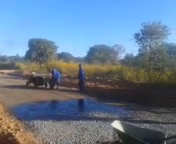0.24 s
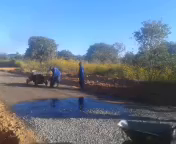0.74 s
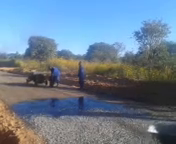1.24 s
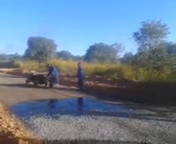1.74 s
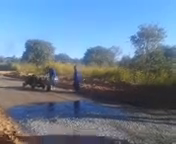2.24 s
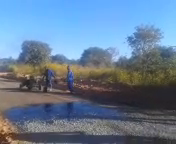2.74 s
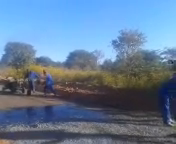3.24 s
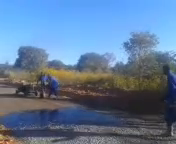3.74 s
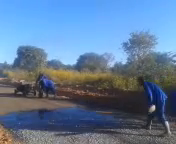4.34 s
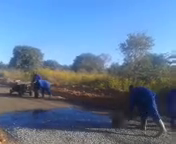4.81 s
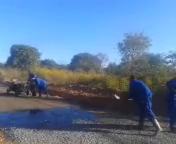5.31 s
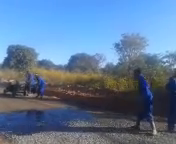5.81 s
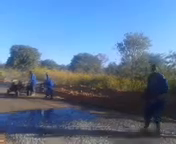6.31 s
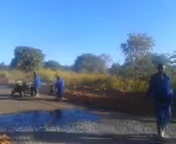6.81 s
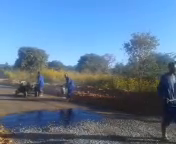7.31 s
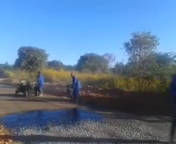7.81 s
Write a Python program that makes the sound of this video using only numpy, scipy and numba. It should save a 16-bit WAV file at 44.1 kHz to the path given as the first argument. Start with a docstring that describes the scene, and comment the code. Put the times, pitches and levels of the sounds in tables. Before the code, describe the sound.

Workers shovel and spread stone chips on a road bed outdoors. A sharp crunch and loud gravel rush open the scene, then scrapes shrink to small scattered crunches. After a quiet middle, a broad pour swells and fades, followed by light ticking, a faint steel clink and crisp final throws. A phone a few metres away hears it thin in bass, with dulled top treble and a faint hiss.

```python
"""Stone chips slide, pour and shower as workers shovel them over a road bed, a few metres from the phone.
Each slide is thousands of damped stone rings, in four sizes, that follow a list of swelling and dying loads.
Boots and shovels crunch as bursts of repeated knocks with a thud; a steel blade rings once through its modes.
Behind lie the noise hush of open country and a faint steady low noise. The microphone colour thins the bass;
16 kHz sampling leaves only a faint mirror above 8 kHz."""
import sys
import numpy as np
from scipy import signal
from scipy.fft import rfft, irfft
from scipy.io import wavfile
from scipy.ndimage import uniform_filter1d
from numba import njit

SR = 44100
rng = np.random.default_rng(int(sys.argv[2]) if len(sys.argv) > 2 else 0)


def invert_db(x):
    """Field ratio 10**(x/20) for x, a level in decibels (scalar or array-like)."""
    u = np.asarray(x, float) / 20
    return 10 ** u


def unload_audio(sound):
    """Save the sound as a 16-bit wav file, at the path given as the first command line argument."""
    columns = np.transpose(np.atleast_2d(sound))
    # keep every value between -1 and 1, then stretch to whole-number steps
    steps = np.round(np.clip(columns, -1, 1) * 32767)
    wavfile.write(sys.argv[1], SR, steps.astype(np.int16))


N = 355446
T = np.arange(N) / SR

# pushes, scrapes and throws, swell and dying away each spanning 20 dB:
# [fullest flow t/s, relative level/dB, swell t/s, dying away t/s, coarseness level/dB]
SLIDES = [(0.0, -34.5, .01, .13, -6.5), (.13, -51.5, .03, 0.057, -11), (.226, -34, 0.02, .02, -1),
          (.24, -27, 0.01, 0.1, -2), (.27, -37.5, 0.058, 0.22, 5.5), (.38, -40, 0.14, .05, 4),
          (.415, -42, .005, 0.44, 6), (.68, -27.5, 0.44, 0.51, 1), (.55, -32.5, 0.19, 0.36, -1),
          (.79, -28, 0.103, 0.15, -5.5), (.885, -30, .003, 0.25, -9), (.93, -34, .06, .06, -3),
          (1.05, -37, 0.26, 0.27, 0.5), (1.16, -33.5, 0.22, 0.11, 5), (1.28, -40, 0.16, 0.22, 1),
          (1.4, -39.5, 0.94, 0.53, 3), (1.59, -52.5, 0.024, 0.14, 6), (1.713, -39.5, .05, 0.21, 0),
          (1.847, -39, 0.049, 0.15, 1), (1.993, -40.5, 0.078, 0.033, 3), (2.03, -33, 0.052, 0.18, 4),
          (2.3, -42.5, 0.22, 0.33, 2.5), (2.47, -41.5, 0.19, .3, -1), (2.5, -48, 0.11, 0.14, 7.5),
          (2.67, -53.5, .2, .2, -5), (2.732, -41, 0.12, 0.031, -5), (2.785, -47.5, 0.046, .2, 9.5),
          (2.85, -29.5, 0.075, 0.067, 0.5), (3.0, -47, 0.56, 0.46, 2), (3.49, -49, 0.29, 0.48, 3.5),
          (3.555, -51.5, .12, 0.27, 8.5), (3.72, -46, 0.013, 0.29, 5), (3.8, -45.5, 0.19, 0.042, 1.5),
          (4.096, -50.5, 0.28, 0.17, 6), (4.23, -38.5, 0.076, 0.39, -4), (4.39, -40, 0.3, 0.16, 3.5),
          (4.52, -45, 0.081, .3, 8.5), (4.86, -47.5, 0.15, 0.054, -9), (4.91, -34, .03, 0.66, -5.5),
          (5.12, -42, 0.62, 0.47, -17), (5.24, -33, 0.17, 0.33, 0.5), (5.34, -29, 0.24, 0.25, 1.5),
          (5.4, -30.5, 0.22, 0.24, 2), (5.48, -31.5, 0.41, 0.1, 3), (5.53, -43, 0.34, 0.077, 9.5),
          (5.623, -50, .06, 0.035, 19.5), (5.76, -59, 0.082, 0.077, 23), (5.79, -43, .005, 0.2, 2),
          (5.882, -48.5, 0.16, 0.28, 7.5), (6.3, -52, 0.64, 0.43, 10), (6.44, -42.5, .2, 0.19, 7),
          (6.5, -43.5, 0.19, 0.34, 7.5), (6.57, -48, .15, 0.23, 9.5), (6.642, -46, .03, .1, 7),
          (6.77, -46, 0.011, 0.26, 8.5), (6.915, -34.5, 0.013, 0.039, -5), (6.96, -48.5, 0.14, 0.3, 8),
          (7.11, -54, .12, .06, 11), (7.199, -38, 0.0094, 0.03, -3), (7.257, -41.5, 0.062, 0.053, 1.5),
          (7.35, -57.5, .15, 0.11, 7.5), (7.52, -29, 0.013, 0.19, -2.5), (7.567, -28.5, 0.063, 0.024, 5),
          (7.687, -59, 0.23, .15, -6), (7.84, -54, 0.33, 0.28, 7), (7.95, -31.5, 0.0074, 1, -2),
          (8.04, -39, 0.15, .5, 6)]
# boots and shovels biting into the chips:
# [t/s, relative peak level/dB, pitch f/Hz, relative thud level/dB, pitch scatter as a log-pitch spread]
CRUNCHES = [(0.0257, -17.5, 3890, -47, 0.22), (0.2062, -23, 2380, -38, 0.27),
            (0.2346, -7.5, 2140, -18, 0.26), (0.3102, -21.5, 2850, -35, 0.16),
            (0.3433, -22, 3000, -34, 0.3), (0.415, -23, 2130, -39, 0.3), (0.6784, -23, 2660, -31, 0.3),
            (0.7826, -11, 1377, -16.5, 0.3), (0.8818, -16, 4190, -37, 0.3), (0.9125, -15, 3500, -39, 0.16),
            (1.1677, -17, 4720, -34, 0.37), (1.264, -21, 1510, -46, 0.4), (1.3566, -20, 4730, -41, 0.2),
            (1.4174, -22, 3350, -43, 0.35), (1.5074, -24, 4700, -32, 0.3), (1.5427, -22, 3770, -47, 0.4),
            (1.5898, -29, 3080, -49, 0.14), (1.6068, -22, 2410, -43, 0.12), (1.6646, -35, 2370, -45, 0.3),
            (1.6971, -24, 4970, -40, 0.3), (1.7282, -25.5, 4770, -44, 0.2),
            (1.7843, -25.5, 5140, -40, 0.13), (1.8372, -26, 2150, -43, 0.42),
            (1.9247, -22.5, 2110, -46, 0.38), (1.991, -24, 1486, -30, 0.3), (2.0208, -20, 4560, -26, 0.2),
            (2.0437, -15.5, 2140, -30, 0.32), (2.1144, -27, 3320, -56, 0.25),
            (2.204, -24.5, 2780, -37, 0.42), (2.2293, -29, 5270, -46, 0.24), (2.2434, -38, 4520, -44, 0.3),
            (2.2613, -27, 1250, -45, 0.3), (2.2894, -28, 1263, -49, 0.3), (2.318, -25, 5180, -46, 0.05),
            (2.3436, -23.5, 3740, -50, 0.3), (2.3693, -26, 4700, -52, 0.35),
            (2.4134, -19.5, 2250, -40, 0.42), (2.6554, -33, 3540, -69, 0.23),
            (2.825, -19.5, 4110, -26, 0.4), (2.8473, -19, 5200, -31, 0.2), (3.048, -27, 4420, -62, 0.14),
            (3.1093, -25.5, 3260, -63, 0.41), (3.178, -37, 3210, -42, 0.33),
            (3.3525, -20.5, 2690, -49, 0.3), (3.4171, -40, 3900, -57, 0.2), (3.4411, -39, 2820, -59, 0.2),
            (3.4501, -38, 2850, -48, 0.2), (3.884, -32.5, 4620, -56, 0.3), (4.1684, -33, 4830, -58, 0.26),
            (4.372, -21, 2700, -27, 0.3), (4.4423, -28, 4420, -47, 0.35), (4.5228, -20, 4200, -25.5, 0.05),
            (4.555, -27, 3700, -43, 0.22), (4.6353, -35, 4280, -44, 0.2), (4.7204, -16.5, 4850, -48, 0.35),
            (4.799, -32, 5160, -56, 0.3), (4.8469, -27, 2830, -54, 0.38), (4.8865, -27, 2000, -43, 0.3),
            (4.8967, -24.5, 3410, -31, 0.3), (4.9104, -20, 4900, -33, 0.42), (5.6198, -34, 1310, -30, 0.4),
            (5.7484, -46, 1930, -37, 0.3), (5.788, -31, 2750, -38, 0.15), (5.8726, -29.5, 2060, -29, 0.36),
            (5.9684, -34, 1870, -32, 0.13), (5.9904, -28.5, 2030, -50, 0.37), (6.2076, -40, 1350, -33, 0.3),
            (6.2422, -36, 2180, -35, 0.2), (6.351, -35, 1210, -39, 0.3), (6.4193, -25, 1470, -41, 0.3),
            (6.4403, -24.5, 2240, -35, 0.3), (6.6368, -38, 1290, -32, 0.37),
            (6.6982, -29.5, 1990, -36, 0.3), (6.7428, -32, 1260, -40, 0.4), (6.7664, -27, 2200, -35, 0.35),
            (6.786, -25.5, 1410, -40, 0.36), (6.8315, -34.5, 1260, -41, 0.3), (6.8733, -34, 3660, -48, 0.4),
            (6.9099, -27, 1927, -39, 0.2), (6.983, -29, 3360, -53, 0.19), (7.0594, -33, 2060, -47, 0.3),
            (7.1095, -25, 4670, -32.5, 0.37), (7.1818, -31.5, 2140, -41, 0.25),
            (7.197, -26, 3620, -30.5, 0.31), (7.2584, -30, 2450, -46, 0.42), (7.4255, -33, 1340, -43, 0.34),
            (7.4825, -25.5, 4310, -43, 0.28), (7.5057, -13, 3520, -24, 0.25), (7.5235, -10, 4420, -24, 0.3),
            (7.5682, -13, 3490, -47, 0.2), (7.675, -24.5, 4800, -56, 0.3), (7.729, -31, 2010, -30, 0.4),
            (7.7837, -29.5, 4240, -52, 0.1), (7.8166, -36, 2260, -41.5, 0.1), (7.8685, -33, 4840, -53, 0.3),
            (7.884, -33, 2320, -54, 0.24)]
# blows on the blade: [t/s, relative peak level/dB]
BLADE_BLOWS = [(6.911, -20)]
# plate modes of the steel blade: [f/Hz, relative level/dB, 60 dB decay t/s]
BLADE_MODES = [(647, -11.5, 0.72), (780, -9, 0.51), (1470, -8, 0.27), (1870, -10.5, 0.46), (1965, 0, 0.2),
               (2500, -8.5, 0.38), (3620, -1, 0.14)]
# road bed, air and microphone, then the steep treble fall above 7 kHz: [f/Hz, level/dB]
MICROPHONE_COLOUR = [(100, -29.5), (150, -12), (260, -2), (500, 3), (800, -2), (1150, 0), (1600, -3),
                     (2200, -0.5), (3000, -1.5), (4100, 1), (5500, -0.5), (6700, -4), (7200, -8),
                     (7600, -33), (7950, -42)]
# resonances of the loaded shovel pan: [f/Hz, width f/Hz, relative level/dB]
PAN_RESONANCES = [(506, 51, 1), (1098, 24, -3.5), (1352, 110, -1.5), (2156, 41, 3.5), (2370, 13, -2.5),
                  (3276, 47, 4.5), (4050, 100, 3), (4700, 100, 1.5)]
# mix of the heap being worked: [t/s, relative grit level/dB, relative larger-stone level/dB]
HEAP_MIX = [(0, -1.5, 5.5), (.45, 4, -10), (.75, -1, 3.5), (1.2, 2, 1), (1.7, -3.5, -2.5), (2.3, -1.5, -4),
            (2.6, 1.5, 0.5), (3.2, -2, -1), (3.8, 1, 0), (4.3, 1, 0), (4.95, 3.5, -1.5), (5.15, 0.5, -2.5),
            (5.35, 1.5, 3), (5.55, -1.5, 8.5), (6.0, -7, -3), (6.5, 5.5, 0), (7.0, 3.5, -0.5),
            (7.4, 0.5, 5.5), (7.65, 2, -2.5), (8.06, 0.5, -2)]
# how loose the bed lies where the chips land, a deeper bed thuds lower: [t/s, central thud f/Hz]
BED_LOOSENESS = [(0, 440), (1.5, 450), (2.25, 388), (3.0, 399), (4.4, 379), (4.9, 372), (5.15, 510),
                 (5.9, 511), (6.5, 457), (7.2, 460), (7.7, 401)]


def rms1(x):
    """Scale to rms 1."""
    return x / np.sqrt(np.mean(x ** 2))


@njit
def rings(at, hz, t60, size, turn):
    """Sum of exponentially damped sines, one for each knock, each cut off after its t60."""
    out = np.zeros(N)
    for k in range(len(at)):
        step = np.exp(2j * np.pi * hz[k] / SR - np.log(1000) / (t60[k] * SR))
        z = size[k] * np.exp(1j * turn[k])
        for i in range(int(at[k] * SR), min(N, int((at[k] + t60[k]) * SR) + 1)):
            out[i] += z.real
            z *= step
    return out


def knocks(at, hz, spread, cycles, size, uneven_db):
    """Stones ring at scattered pitches, some dead and some clear; unevenness makes a few knocks hard."""
    pitch, clear = rng.standard_normal((2, len(at)))
    luck, turn = rng.exponential(size=len(at)), rng.random(len(at))
    hz = np.clip(hz * np.exp(spread * pitch), 100, 8000)
    t60 = cycles * np.exp(0.61 * clear) / hz
    hard = invert_db(uneven_db * luck)
    # ring energy times the mean power of the random hardness
    power = t60 * SR / (4 * np.log(1000)) / (1 - uneven_db * np.log(10) / 10)
    return rings(at, hz, t60, size * hard / np.sqrt(power), 2 * np.pi * turn)


def walk(rate):
    """Random levels held 1 / rate s and slewed over half that time; spread near 1."""
    held = rng.standard_normal(N // 100)[(T * rate).astype(int)]
    return uniform_filter1d(held, int(SR / rate / 2))


def low_noise():
    """Faint steady noise below 61 Hz."""
    low = signal.butter(6, 61, fs=SR, output="sos")
    return invert_db(-68) * rms1(signal.sosfilt(low, rng.standard_normal(N)))


def hush():
    """The even hush of open country: white noise."""
    return invert_db(-49.5) * rng.standard_normal(N)


def blade():
    """Every blow wakes the same plate modes, each starting from zero displacement."""
    s, peak_db = np.transpose(BLADE_BLOWS)[:, :, None]
    hz, mode_db, t60 = np.transpose(BLADE_MODES)
    size = invert_db(peak_db + mode_db - 14.5)
    at, hz, t60 = [(v + 0 * size).ravel() for v in (s, hz, t60)]
    return rings(at, hz, t60, size.ravel(), np.full(size.size, np.pi / 2))


def crunch():
    """A few stones knock over and over, fast at first and thinning out; the bed thuds a moment later."""
    s, peak_db, pitch_hz, thud_db, scatter = np.transpose(CRUNCHES)[:, :, None]

    def handful(count, level_db, hz, lag_s, span_s, **stone):
        late = rng.random((len(s), count)) ** 1.2  # 0 at the start of the burst, 1 at its end
        at = s + lag_s + span_s * late
        onset = 1 - np.exp(-late / 0.017)
        size = invert_db(level_db - 38.5 * late) * onset * np.sqrt(span_s * SR / count)
        return knocks(at.ravel(), (hz + 0 * late).ravel(), size=size.ravel(), **stone)

    # six stones around the named pitch, the first two on it
    offsets = scatter * rng.standard_normal((len(s), 6)) * [0, 0, 1, 1, 1, 1]
    stones_hz = np.tile(pitch_hz * np.exp(offsets), 8)
    thud_hz = 1.06 * np.interp(s, *np.transpose(BED_LOOSENESS))
    chips = handful(count=48, level_db=peak_db - 8.5, hz=stones_hz, lag_s=0, span_s=.02121,
                    spread=.025, cycles=73.0, uneven_db=0.0)
    thud = handful(count=12, level_db=thud_db - 5, hz=thud_hz, lag_s=.002, span_s=.023205,
                   spread=.22, cycles=8.3, uneven_db=0.0)
    return chips + thud


def pan(x):
    """The steel pan adds its own resonances to whatever slides over it."""
    out = x.copy()
    for hz, width, db in PAN_RESONANCES:
        b, a = signal.iirpeak(hz, hz / width, fs=SR)
        out += invert_db(db - 12.0) * signal.lfilter(b, a, x)
    return out


def moving_loads():
    """All moving loads as columns: the listed slides and the loose chips each crunch sets rolling."""
    s, peak_db, _, thud_db, _ = np.transpose(CRUNCHES)
    coarse_db = .4 * (thud_db - peak_db + 20)  # a deep thud means coarse stones
    swell_s, dies_s = np.full_like(s, .0075), np.full_like(s, .037)
    rolls = np.c_[s + .0039, peak_db - 18.5, swell_s, dies_s, coarse_db]
    loads = np.r_[SLIDES, rolls]
    mix_s, grit_db, large_db = np.transpose(HEAP_MIX)
    grit_db = np.interp(loads[:, 0], mix_s, grit_db)
    large_db = np.interp(loads[:, 0], mix_s, large_db)
    return np.c_[loads, grit_db, large_db].T[:, :, None]


def slide():
    """Dense knocks in four sizes of stone; the flow comes in surges that all sizes share."""
    s, level_db, swell, dies, coarse_db, grit_db, large_db = moving_loads()
    coarse_t = T[::44]  # about one point a millisecond
    away = np.where(coarse_t < s, (s - coarse_t) / swell, (coarse_t - s) / dies)
    shape_db = level_db - 20 * away ** .92  # exponent 1 would be straight in dB
    surge_db = 1.6 * walk(45) + 1.68 * walk(15)

    def stream(count, size_db, coarse, hz, share, uneven_db, **stone):
        at = rng.random(count) * N / SR
        # loads add in power; coarse loads favour the large stones
        power = (invert_db(shape_db + coarse * coarse_db + size_db) ** 2).sum(axis=0)
        flow_db = np.interp(at, coarse_t, 10 * np.log10(power + 1e-8))
        # a full pour is a smooth rush; in a trickle single stones stand out
        trickle = np.clip((-16 - flow_db) / 26, .5, 1)
        surge = trickle * share * surge_db[(at * SR).astype(int)]
        size = invert_db(flow_db + surge) / np.sqrt(count / N)
        stone_hz = np.interp(at, coarse_t, np.full_like(coarse_t, hz))
        return knocks(at, stone_hz, size=size, uneven_db=trickle * uneven_db, **stone)

    bed_hz = np.interp(coarse_t, *np.transpose(BED_LOOSENESS))
    chips = stream(count=16000, size_db=-1.5, coarse=-.15, hz=2692.0, share=1.0,
                   spread=.2664, cycles=26.3, uneven_db=2.0)
    grit = stream(count=24000, size_db=grit_db - 2.5, coarse=-.15, hz=5240.0, share=1.54,
                  spread=.2115, cycles=21.0, uneven_db=1.0)
    large = stream(count=7000, size_db=large_db - 9.0, coarse=.74, hz=1223.0, share=.76,
                   spread=.237, cycles=23.4, uneven_db=1.5)
    thuds = stream(count=5000, size_db=-6.0, coarse=1.0, hz=bed_hz, share=.93,
                   spread=.3915, cycles=13.4, uneven_db=2.0)
    return chips + grit + large + thuds


def scene():
    """Stones and steel over the hush of open country, on one channel."""
    return (hush() + blade() + crunch() + pan(slide()))[None]


def coloured(x):
    """Causal minimum-phase filter for road bed, air, microphone and the steep treble fall, from the cepstrum of
    the log gain."""
    hz, db = np.transpose(MICROPHONE_COLOUR)
    grid_hz = np.linspace(1, SR / 2, num=2049)
    log_gain = np.interp(np.log(grid_hz), np.log(hz), db) * np.log(10) / 20
    cep = irfft(log_gain)
    cep = np.r_[cep[0], 2 * cep[1:2048], cep[2048], np.zeros(2047)]  # fold onto positive time
    impulse = irfft(np.exp(rfft(cep)))
    return signal.fftconvolve(x, impulse[None], axes=1)[:, :N]


def rate_mirror(x):
    """Raising the 16 kHz sample rate leaves a faint copy of the treble, mirrored about 8 kHz."""
    mirror = x * np.cos(2 * np.pi * 16000 * T)
    band = signal.butter(6, [8100, 9150], "band", fs=SR, output="sos")
    return invert_db(-26.5) * signal.sosfilt(band, mirror)


def roll_off(x):
    """The treble ends steeply here."""
    return signal.sosfilt(signal.butter(12, 9200, fs=SR, output="sos"), x)


def record(dry):
    """The phone: microphone colour, steep cut near 8 kHz and treble mirror, over a faint low noise."""
    x = coloured(dry)
    x = signal.sosfilt(signal.ellip(6, .3, 60, 7950, fs=SR, output="sos"), x)
    mix = x + rate_mirror(x) + low_noise()
    return roll_off(mix)


dry = scene()
out = record(dry)
unload_audio(out)
```